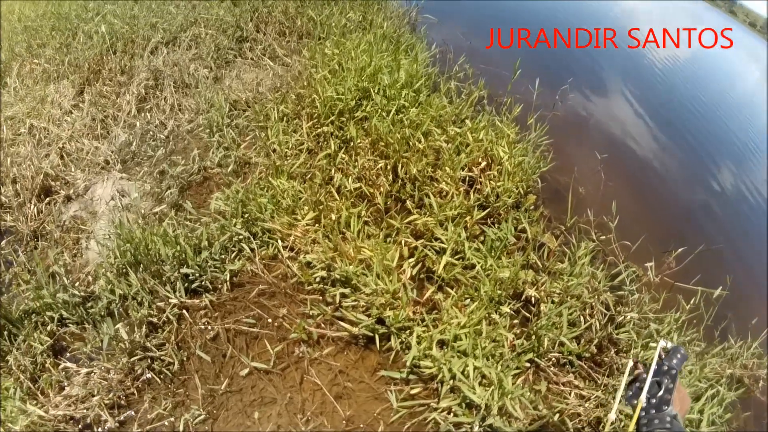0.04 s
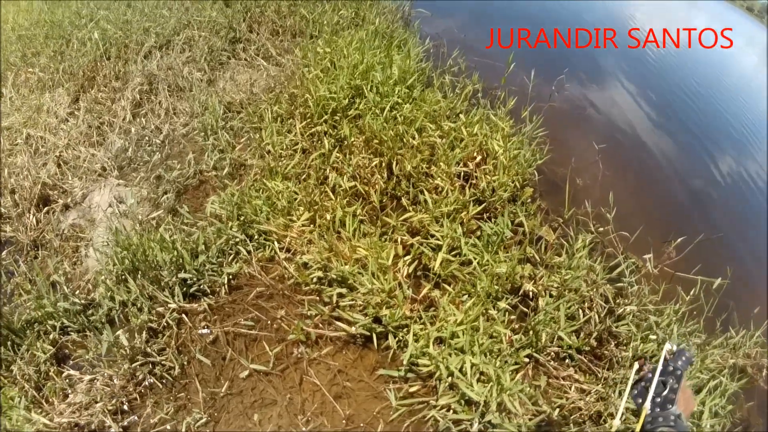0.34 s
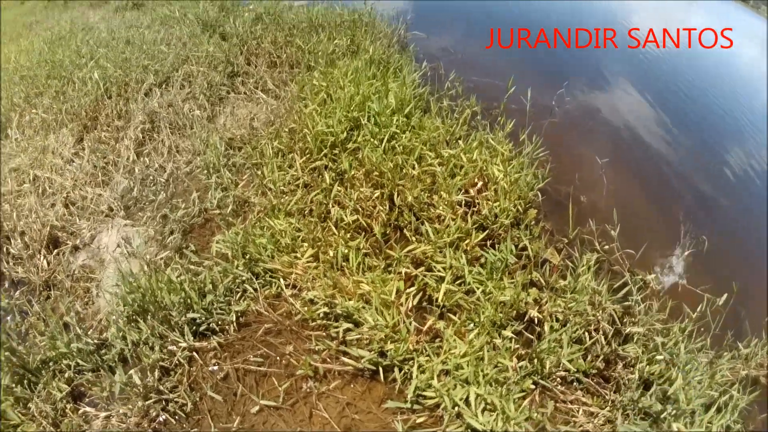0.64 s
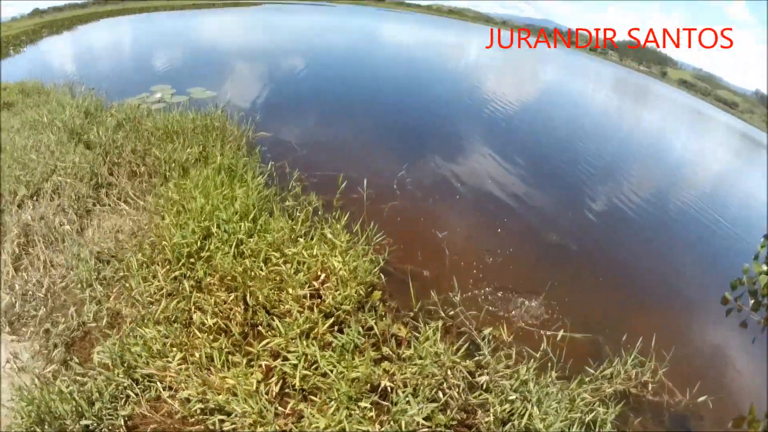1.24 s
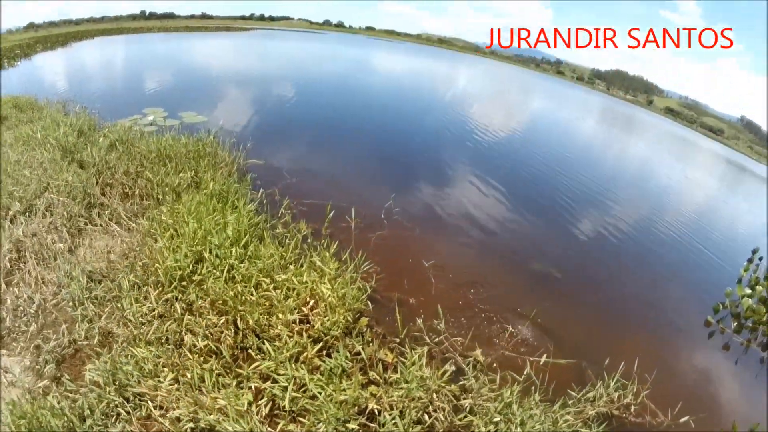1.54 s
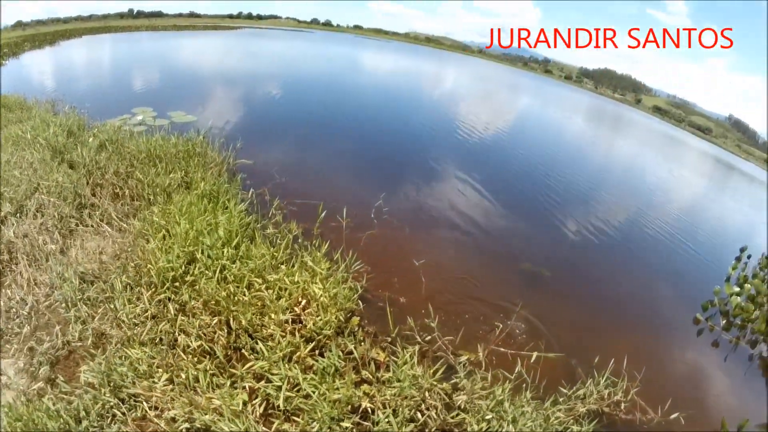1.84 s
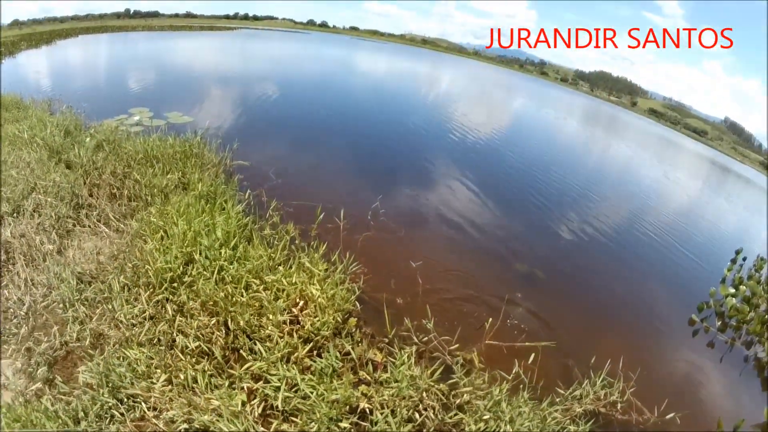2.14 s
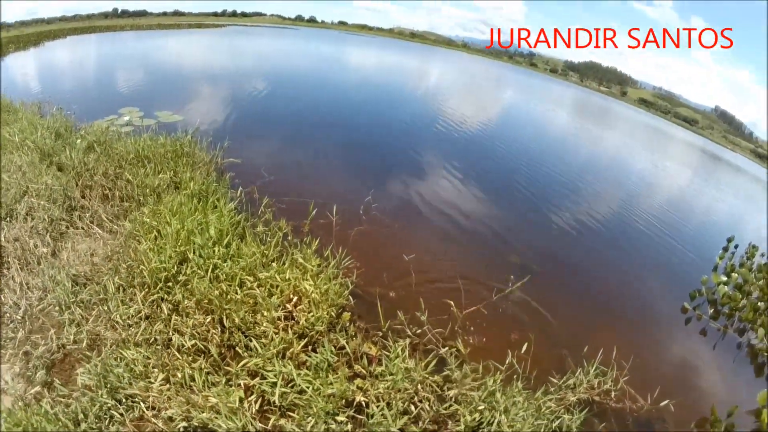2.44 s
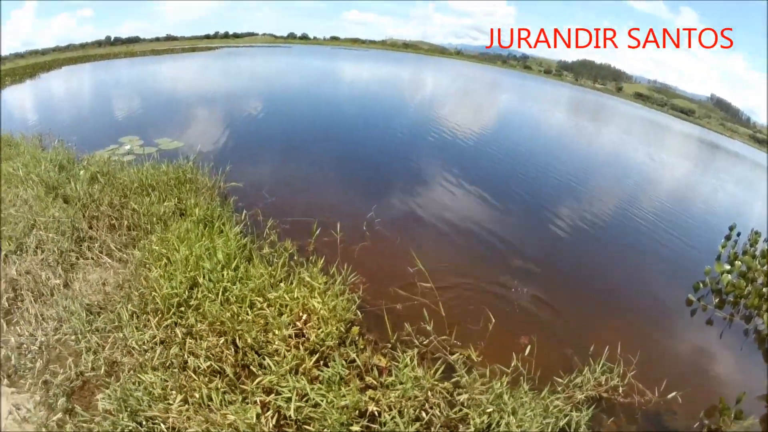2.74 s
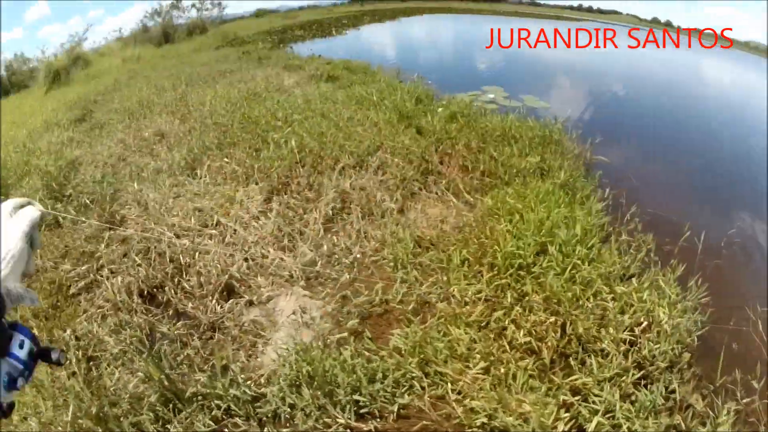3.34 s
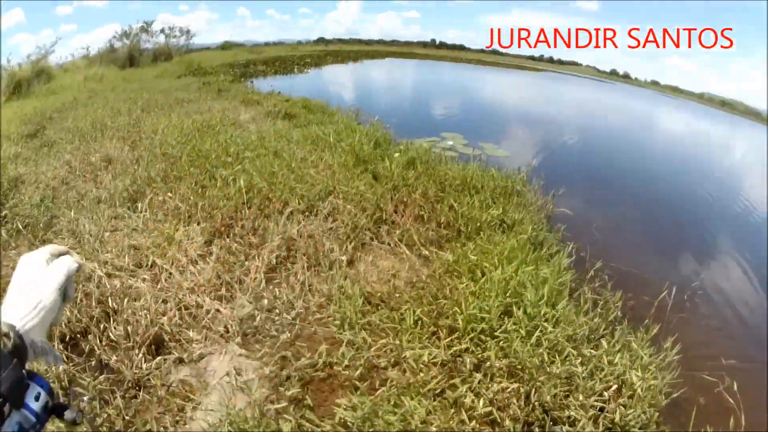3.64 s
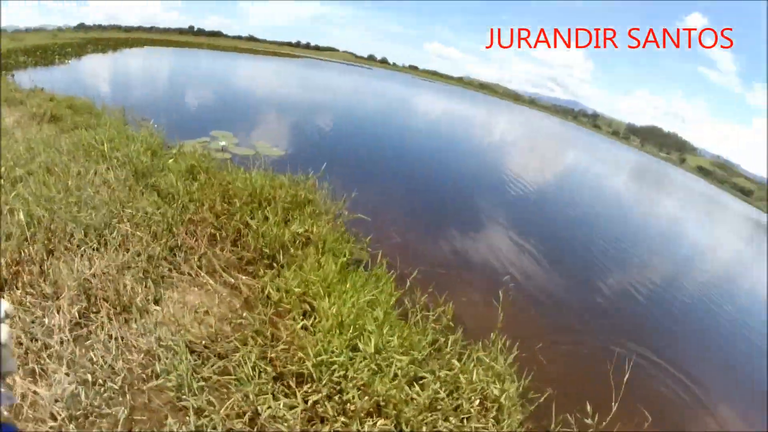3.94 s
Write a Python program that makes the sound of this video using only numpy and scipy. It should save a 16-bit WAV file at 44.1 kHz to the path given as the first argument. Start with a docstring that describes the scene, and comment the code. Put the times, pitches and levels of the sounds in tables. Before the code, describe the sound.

A projectile splashes into a calm lake, followed later by soft gear knocks and rustling.

```python
"""A slap, a crackling sheet of spray and a plop: a projectile hits a calm lake a few metres from the bank.
The plop is the air cavity snapping shut; it leaves bubbles ringing, and a few drops fall back.
Near the end the shooter turns: gear knocks softly and clothing rustles.
Light wind rumbles on the microphone throughout."""
import sys
import numpy as np
from scipy import signal
from scipy.fft import rfft, irfft, next_fast_len
from scipy.io import wavfile
from scipy.ndimage import map_coordinates

SR = 44100
rng = np.random.default_rng(int(sys.argv[2]) if len(sys.argv) > 2 else 0)


def dump_mix(stems):
    """Bounce the given channels to the path in sys.argv[1] as a 16-bit WAV at rate SR."""
    frames = np.atleast_2d(stems).T  # one column per channel
    limited = np.clip(frames, -1, 1)  # hard clip at full scale
    pcm = np.round(limited * 32767).astype(np.int16)
    wavfile.write(sys.argv[1], SR, pcm)


N = 176400
T = np.arange(N) / SR

# wet tone of spray and drops (frequency [Hz], level [dB])
WATER_COLOUR = [(200, -49), (400, -9), (800, -2.5), (1270, -1), (1700, -3.5), (2100, -8), (3300, -12),
                (4400, -18), (5100, -24), (6600, -21), (9000, -36), (15000, -53)]


def amp(db):
    """Decibels to gain."""
    return 10 ** (np.asarray(db) / 20)


def unit(x):
    """Scale to rms 1."""
    return x / np.sqrt(np.mean(x ** 2) + 1e-20)


def filtered(x, response):
    """Filter x with a gain given as a function of frequency."""
    size = next_fast_len(N + SR // 2)
    return irfft(rfft(x, size) * response(np.fft.rfftfreq(size, 1 / SR)), size)[:N]


def coloured(x, points):
    """EQ x through (frequency [Hz], level [dB]) points, at rms 1."""
    hz, db = np.transpose(points)
    return unit(filtered(x, lambda f: amp(np.interp(np.log(f + 1), np.log(hz + 1), db))))


def noise():
    """White noise."""
    return rng.standard_normal(N)


def grains(per_s):
    """Random ticks of random size, at rms 1."""
    return unit(noise() * (rng.random(N) < per_s / SR))


def wobble(per_s):
    """A smooth random curve through per_s knots a second."""
    return map_coordinates(noise(), [T * per_s + 2])


def burst(start, attack, t60):
    """Envelope with a quick rise and an exponential fall; times in seconds."""
    age = np.maximum(T - start, 0)
    return (1 - np.exp(-age / attack)) * np.exp(-np.log(1000) * age / t60)


def ring(start, hz, attack, t60, rise=0):
    """A decaying sine whose pitch climbs by the fraction rise per t60."""
    age = np.clip(T - start, 0, 2 * t60)
    return burst(start, attack, t60) * np.sin(2 * np.pi * hz * age * (1 + rise * age / t60 / 2))


def levels(rows):
    """A gain curve for each dB column, silent before the first row and held after the last."""
    times, *columns = np.transpose(rows)
    return [amp(np.interp(T, times, db, left=-np.inf)) for db in columns]


def spray():
    """Sheets of water tear into crackling drops and a fizzing mist, and later patter down."""
    # bursts of spray (time [s], level [dB], attack [s], t60 [s])
    spray_bursts = [(.5905, -33.5, 0.0022, 0.055), (.603, -43, .004, 0.13), (0.614, -28, 0.0026, 0.093),
                    (0.63, -38, .001, 0.073), (0.639, -35, 0.0059, .1), (0.663, -26, 0.0012, 0.041),
                    (.692, -53, 0.0023, 0.036), (.723, -58, .002, 0.085)]
    # fizz of the finest mist (time [s], level [dB])
    fizz_levels = [(.591, -66), (.596, -54), (.606, -57), (.62, -59), (.65, -57), (.668, -50), (.683, -68),
                   (.696, -56), (.712, -71), (.78, -77), (.85, -90)]
    # its bright tone (frequency [Hz], level [dB])
    fizz_colour = [(2000, -8), (4000, 1), (5600, -1), (7300, -1), (9000, -8), (12000, -8), (15000, -7)]
    # fine drops landing (time [s], level [dB])
    patter_levels = [(.72, -56), (.8, -66.5), (.88, -66), (.92, -65), (.99, -77), (1.1, -67), (1.3, -78)]
    sheet = coloured(grains(per_s=4000) + amp(3) * noise(), WATER_COLOUR)
    envelope = sum(amp(db) * burst(start, attack, t60) for start, db, attack, t60 in spray_bursts)
    flicker = amp(1.4 * wobble(per_s=250))
    fizz = levels(fizz_levels)[0] * flicker * coloured(noise(), fizz_colour)
    patter = levels(patter_levels)[0] * coloured(grains(per_s=250), WATER_COLOUR)
    return sheet * envelope + fizz + patter


def snaps():
    """Small air pockets snap shut: a cycle or two of pressure and a bright crack."""
    # closing air pockets (time [s], level [dB], pitch [Hz])
    pockets = [(0.5938, -30, 1500), (0.6197, -20, 2600), (0.6318, -11.5, 2820), (0.6324, -25, 3200),
               (0.641, -20.5, 840), (0.6554, -16, 1200), (0.6632, -13.5, 890), (0.6653, -15, 2190),
               (0.6701, -17.5, 2240), (0.6773, -22, 760)]
    decay_cycles = 4.9
    crack = amp(-22) * coloured(noise(), [(1000, -9), (3000, 6), (7000, 2), (9000, -22), (15000, -11)])
    return sum(amp(db) * (ring(start, hz, attack=0.00005, t60=decay_cycles / hz)
                          + crack * burst(start, attack=0.0001, t60=0.005))
               for start, db, hz in pockets)


def cavity():
    """The air cavity collapses with a low plop and the water churns."""
    # hollow tone of churning water (frequency [Hz], level [dB])
    churn_colour = [(60, -28), (150, -11), (300, 6), (450, -1), (620, 2), (750, 5), (1100, -10), (1700, -7),
                    (3000, -30), (8000, -40)]
    plop = amp(-15) * ring(start=0.6677, hz=207, attack=0.00044, t60=0.025)
    churn = amp(-27) * burst(start=0.663, attack=0.0013, t60=0.12) * coloured(noise(), churn_colour)
    return plop + churn


def bubbles():
    """Trapped air rings, its pitch climbing as it nears the surface."""
    # small bubbles on entry, larger as the cavity breaks up (time [s], level [dB], pitch [Hz], t60 [s])
    trapped_air = [(.601, -43, 3320, 0.11), (0.6159, -35.5, 1255, 0.18), (0.6201, -33, 1730, .05),
                   (.621, -40, 3650, 0.033), (.664, -30.5, 752, 0.13), (0.6702, -26.5, 474, .035),
                   (.671, -34.5, 939, 0.12), (0.67, -29, 559.4, 0.14), (.673, -30, 1135, 0.04),
                   (0.675, -34, 1620, 0.035), (.6772, -24, 776, 0.023), (.680, -33.5, 368.4, 0.11),
                   (0.687, -36, 1017, 0.076), (.692, -43, 640, .06), (.717, -33.5, 626, 0.038),
                   (.724, -43, 1700, 0.054), (.732, -46, 1340, .03)]
    return sum(amp(db) * ring(start, hz, attack=0.0006, t60=t60, rise=0.066)
               for start, db, hz, t60 in trapped_air)


def drops():
    """Large drops land with a short rising plip and a little wet noise."""
    # drops falling back (time [s], level [dB], pitch [Hz])
    landings = [(0.899, -44, 1240), (0.903, -48, 1700), (.925, -46, 1400), (.936, -48, 1770),
                (0.9831, -37.5, 1103), (1.066, -41, 1950)]
    decay_cycles = 27
    wet = amp(-13) * coloured(noise(), WATER_COLOUR)
    return sum(amp(db) * (ring(start, hz, attack=0.0011, t60=decay_cycles / hz, rise=0.1)
                          + wet * burst(start, attack=0.0005, t60=0.052))
               for start, db, hz in landings)


def bank(splash):
    """The grassy bank scatters the splash into a short, dull tail."""
    tail = coloured(noise(), [(200, 15), (2000, 10), (10000, -6)]) * burst(0, attack=0.012, t60=0.23)
    return signal.fftconvolve(splash, tail / np.linalg.norm(tail))[:N]


def handling():
    """Gear knocks with a short ring, a scrape and a low thud, and scuffs between; cloth swishes over it."""
    # soft knocks of the gear (time [s], level [dB], pitch [Hz], thud level [dB])
    knocks = [(3.162, -48, 1640, -62), (3.289, -39.5, 1150, -41), (3.414, -43, 1260, -47),
              (3.432, -43, 1010, -43), (3.44, -38.5, 920, -58), (3.504, -50, 1170, -44),
              (3.538, -46, 1510, -43), (3.567, -35.5, 1440, -38.5), (3.578, -33, 1020, -57),
              (3.589, -35, 1160, -62), (3.598, -35.5, 1450, -53), (3.634, -36, 1070, -52),
              (3.687, -40.5, 1230, -60), (3.72, -40, 1270, -56), (3.748, -31.5, 1140, -62),
              (3.775, -36, 1100, -46), (3.783, -46, 1640, -53), (3.798, -33.5, 1560, -43.5),
              (3.896, -43, 1410, -43), (3.986, -36.5, 1540, -60)]
    # gear and clothing rubbing (time [s], scuff level [dB], swish level [dB], hiss level [dB])
    rub_levels = [(3.1, -68.5, -81, -90), (3.4, -56, -73, -85), (3.55, -57, -71, -75),
                  (3.655, -54.5, -61, -70), (3.668, -61, -57, -59.5), (3.70, -59, -55.5, -64),
                  (3.73, -53, -51.5, -58.5), (3.76, -46.5, -51, -64), (3.81, -47.5, -48, -61.5),
                  (3.86, -52, -59, -70), (3.93, -49, -60.5, -76), (4.0, -49.5, -55, -69)]
    # dull tone of scrapes and scuffs (frequency [Hz], level [dB])
    gear_colour = [(150, -15), (380, -4), (700, -6.5), (1080, -0.5), (1650, -9), (1950, -15.5), (3000, -28),
                   (8000, -49)]
    # low body of a knock (frequency [Hz], level [dB])
    thud_colour = [(120, -16), (250, -1), (400, -2.5), (620, -2), (900, -11), (1500, -28), (4000, -50)]
    # midrange swish of cloth (frequency [Hz], level [dB])
    swish_colour = [(500, -14), (1200, 7), (2500, 0.5), (3600, -6), (5000, -21), (8000, -25), (15000, -40)]
    # its hissing top (frequency [Hz], level [dB])
    hiss_colour = [(2000, -6), (3800, 5.5), (7000, -4), (9000, -8.5), (11000, -7), (12500, -21),
                   (15000, -13)]
    knock_attack_s, scrape_db = 0.00056, -14.5
    rings = scrape_gain = thud_gain = 0
    for start, db, hz, thud_db in knocks:
        rings += amp(db) * ring(start, hz, knock_attack_s, t60=0.023)
        scrape_gain += amp(db + scrape_db) * burst(start, knock_attack_s, t60=0.052)
        thud_gain += amp(thud_db) * burst(start, attack=0.0016, t60=0.06)
    scrapes = scrape_gain * coloured(noise(), gear_colour)
    thuds = thud_gain * coloured(noise(), thud_colour)
    scuff_gain, swish_gain, hiss_gain = levels(rub_levels)
    scuffs = scuff_gain * coloured(grains(per_s=2500), gear_colour)
    swish = swish_gain * coloured(grains(per_s=6500), swish_colour)
    hiss = hiss_gain * coloured(noise(), hiss_colour)
    flutter = amp(1.5 * wobble(per_s=90))
    return rings + scrapes + thuds + scuffs + flutter * (swish + hiss)


def wind():
    """Light wind rumbles on the microphone under a smooth hiss of open air."""
    # deep wind rumble (frequency [Hz], level [dB])
    rumble_colour = [(5.9, -35), (10, 3), (25, -2), (108, -14.5), (285, -25.5), (400, -32), (520, -61),
                     (880, -120)]
    # open-air hiss (frequency [Hz], level [dB])
    air_colour = [(240, -26.5), (400, -4), (438, -4.5), (550, -6), (680, -8.5), (734, -9), (1040, -14),
                  (1610, -19.5), (2060, -21), (2360, -17.5), (2870, -24), (3610, -28.5), (5350, -28.5),
                  (6710, -32.5), (15000, -35.5)]
    gusts = amp(0.98 * wobble(per_s=9))
    rumble = amp(-35.5) * unit(gusts * coloured(noise(), rumble_colour))
    air = amp(-57 + 0.03 * wobble(per_s=6.03)) * coloured(noise(), air_colour)
    return rumble + air


def scene():
    """The splash and its faint scatter off the bank, the shooter's movement and the wind, in mono."""
    splash = spray() + snaps() + cavity() + bubbles() + drops()
    return (splash + amp(-22.5) * bank(splash) + handling() + wind())[None]


def record(dry):
    """A brick-wall low-pass takes off the very top of the treble."""
    return filtered(dry[0], lambda hz: hz < 15350)[None]


dry = scene()
out = record(dry)
dump_mix(out)
```